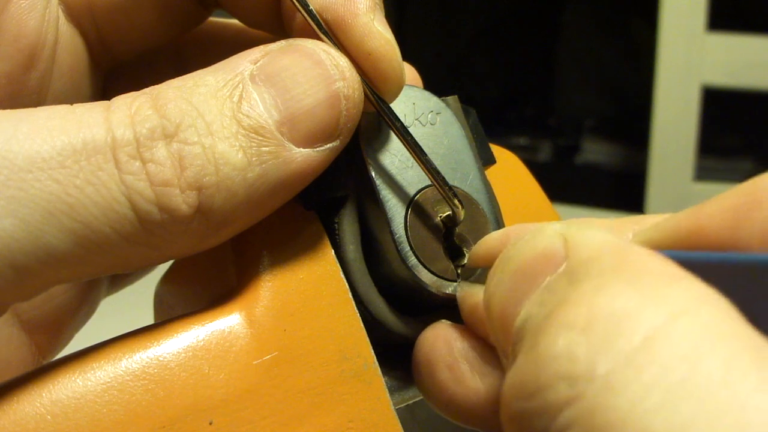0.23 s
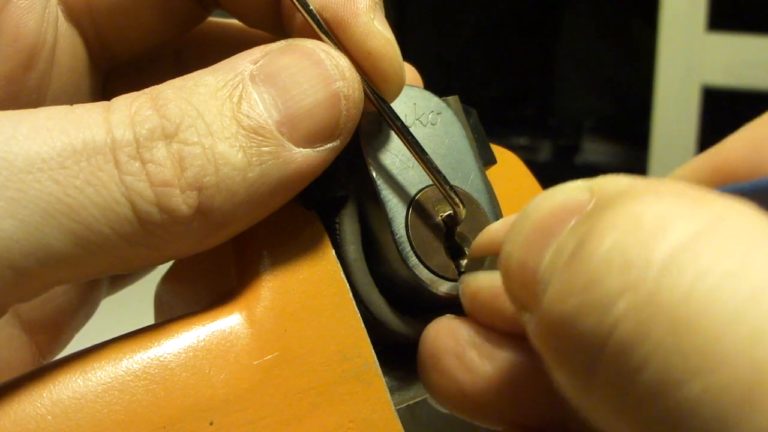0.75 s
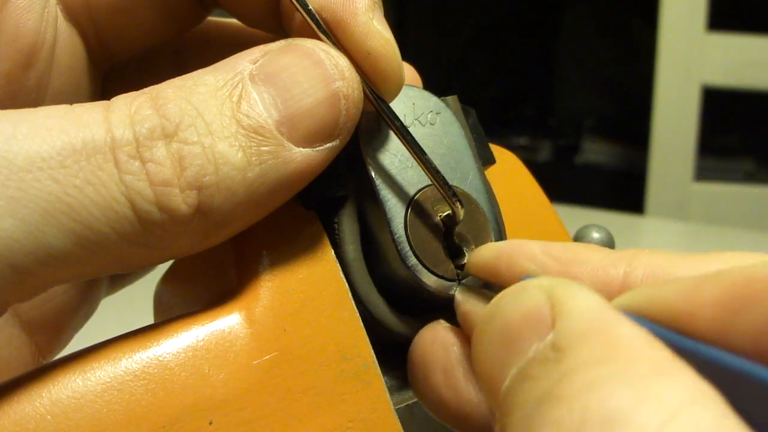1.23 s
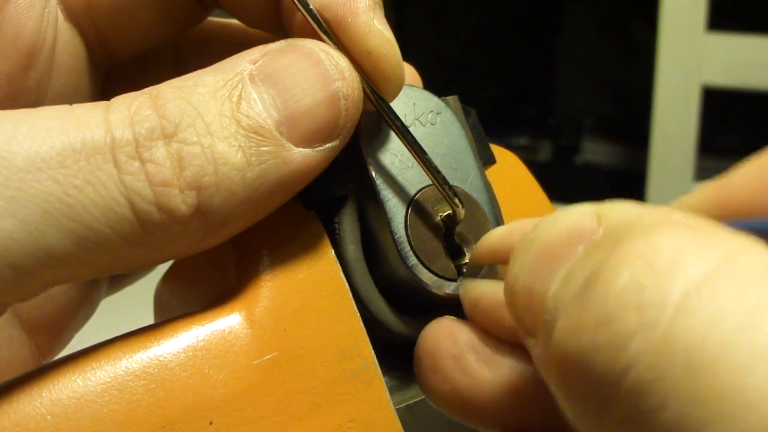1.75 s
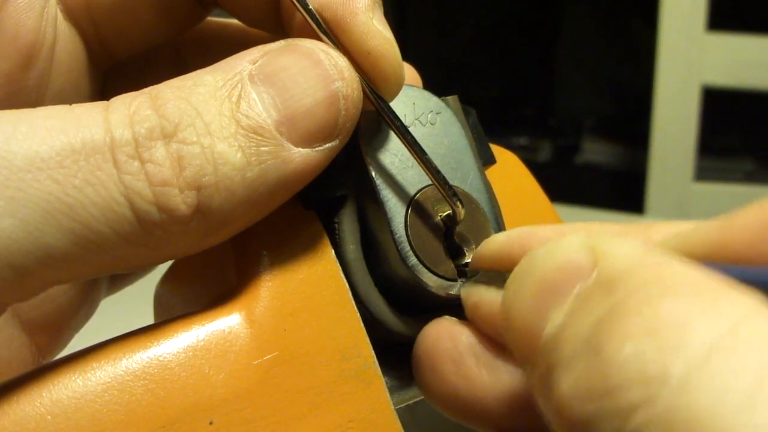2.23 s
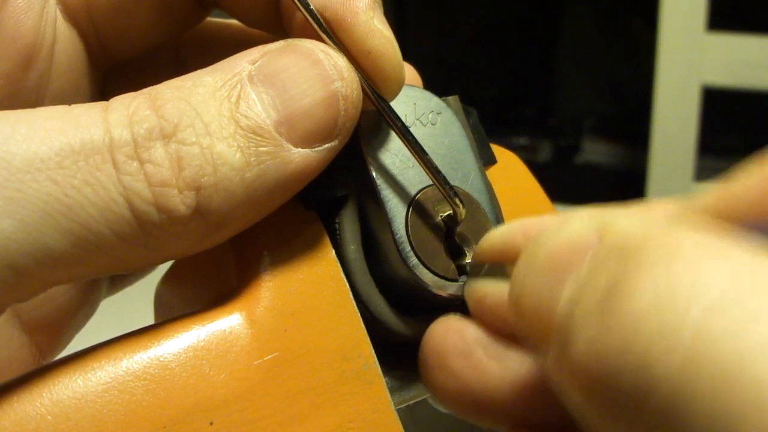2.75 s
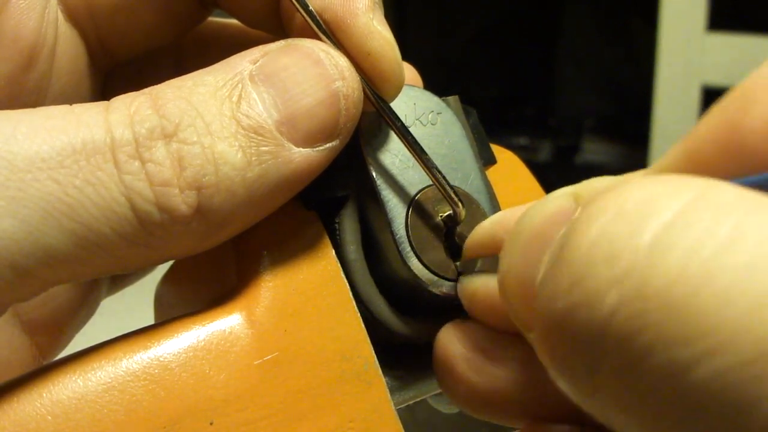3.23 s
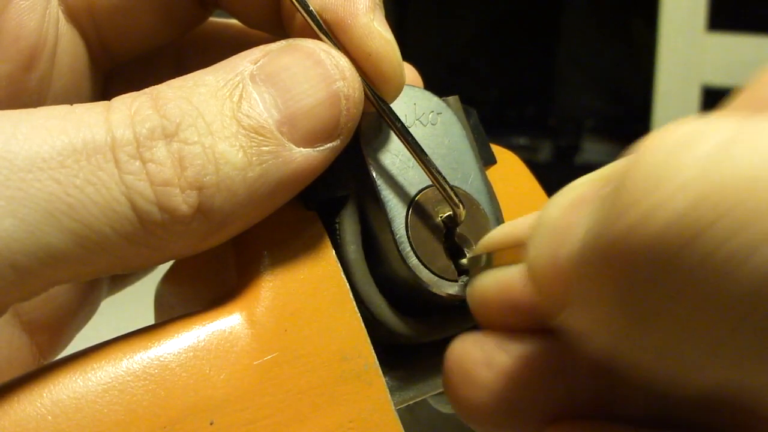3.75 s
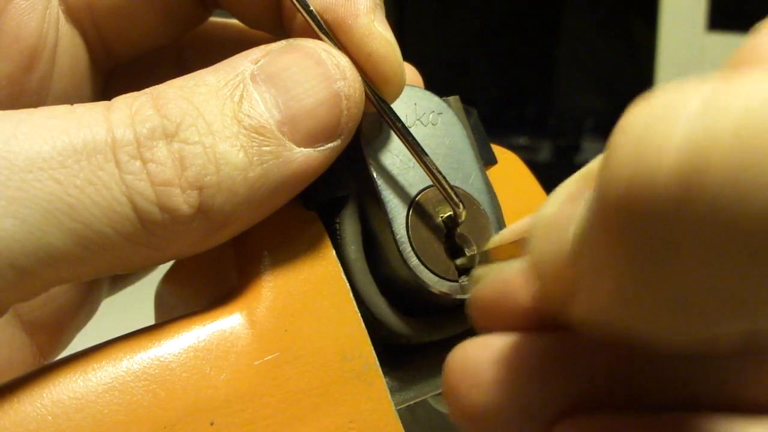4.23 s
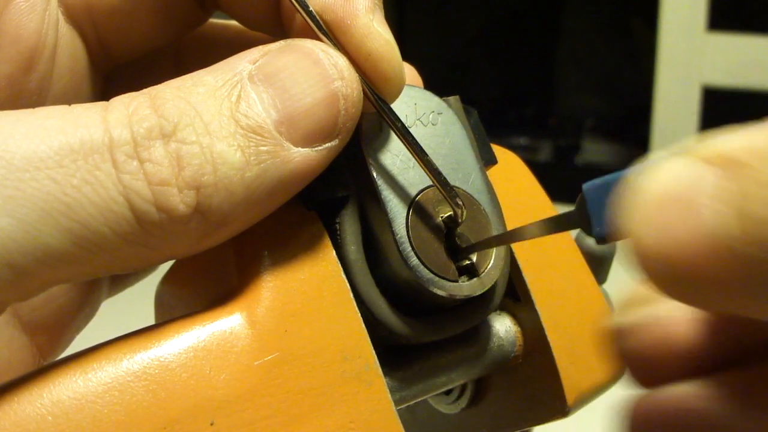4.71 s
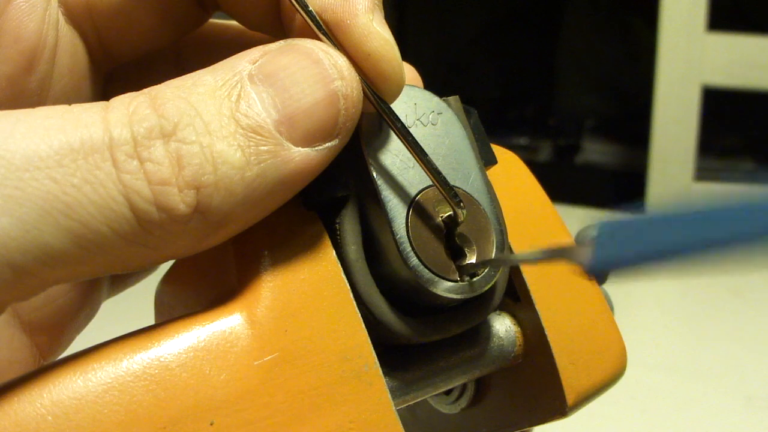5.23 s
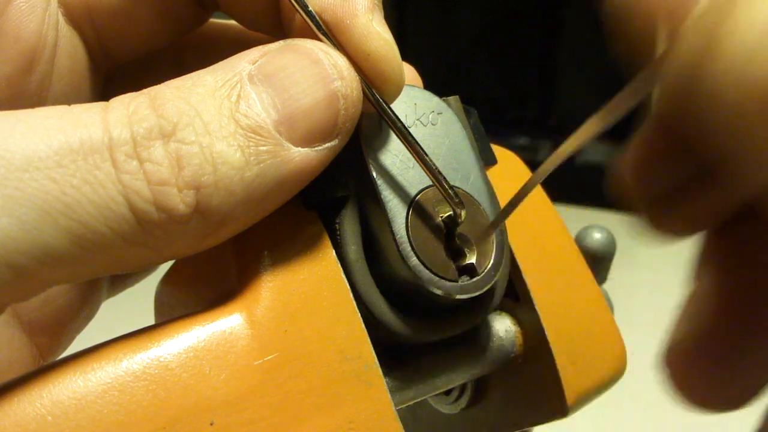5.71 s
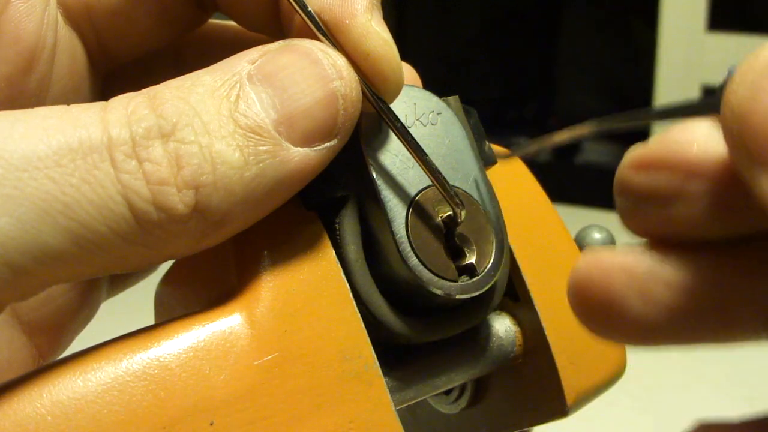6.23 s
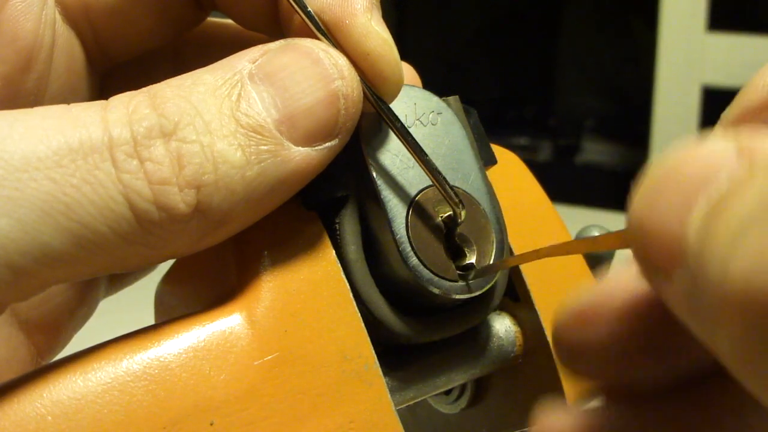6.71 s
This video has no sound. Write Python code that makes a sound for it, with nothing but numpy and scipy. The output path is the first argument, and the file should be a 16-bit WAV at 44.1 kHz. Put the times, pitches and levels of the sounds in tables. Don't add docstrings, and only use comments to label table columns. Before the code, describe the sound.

A thin steel pick works inside a brass lock held in a vice. Sharp, dry clicks of uneven strength come first, the hardest ringing briefly with a dull knock of the vice. After a sparse spell, faint probing ticks and scrapes follow, then the released pick rattles rapidly in the keyway and is caught and pulled out. A few tiny ticks end it. Very close small stereo microphone, quiet room, steady wide hiss.

```python
import sys
import numpy as np
from scipy import signal
from scipy.fft import rfft, irfft
from scipy.io import wavfile
from scipy.ndimage import uniform_filter1d

SR = 44100
rng = np.random.default_rng(int(sys.argv[2]) if len(sys.argv) > 2 else 0)


def waveform_to_disk(signal):
    frames = np.transpose(np.atleast_2d(signal))
    scaled = np.clip(frames, -1, 1) * 32767
    samples = np.round(scaled).astype(np.int16)
    wavfile.write(sys.argv[1], SR, samples)


def level_to_linear(level):
    exponent = np.asarray(level, float) / 20
    return 10 ** exponent


N = 307377

# (frequency [Hz], level [dB], t60 [s])
VICE = [(274.6, -0.5, 0.1), (300, -4, 0.2), (362.5, -1.5, 0.081), (406.6, -11.5, 0.086), (480, -10, 0.11),
        (527, 2, 0.034), (621, -7.5, 0.099), (454, -3.5, 0.013)]
# (frequency [Hz], level [dB], t60 [s])
KEYWAY = [(778.6, -10, 0.25), (880, -3, 0.11), (989, 3, 0.028), (1056, -3, 0.042), (1193, -10, 0.03),
          (1321, 6.5, 0.026), (1374, -17, 0.056)]
# (frequency [Hz], level [dB], t60 [s])
LOOSE_SHELL = [(1535, -9, .07), (1654, -18, .08), (1832, 1, .045), (1815, -8, .07), (2045, -6, .045),
               (2260, -16, .04)]
# (frequency [Hz], level [dB])
TICK = [(1500, -17.5), (2600, -16.5), (3500, -24.5), (4700, -26.5), (6000, -15.5), (10500, -16.5),
        (11500, -28), (12600, -65)]
PIN_PAN_DB, PIN_BODY_DB = 0.5, -1
LOW_CUT_HZ = 80


def steep(x, hz, kind, order=4):
    return signal.sosfilt(signal.butter(order, hz, kind, fs=SR, output="sos"), x)


def colour(x, points):
    size = x.shape[-1]
    bin_hz = np.arange(size // 2 + 1) * SR / size + 1
    hz, db = np.transpose(points)
    return irfft(rfft(x) * level_to_linear(np.interp(np.log(bin_hz), np.log(hz), db)), size)


def add(out, s, x):
    i = int(s * SR)
    n = min(x.shape[-1], N - i)
    out[..., i:i + n] += x[..., :n]


def peak(x, db):
    return x * level_to_linear(db) / np.abs(x).max()


def ring(modes, size=16384):
    hz, db, t60_s = np.transpose(modes)[:, :, None]
    t = np.arange(size) / SR
    decay = np.exp(-np.log(1000) * t / np.maximum(t60_s, .01))
    return level_to_linear(db) * np.sin(2 * np.pi * hz * t) * decay


def burst(noise, ms, rise_ms):
    t_ms = np.arange(len(noise)) / SR * 1000
    return noise * (1 - np.exp(-t_ms / rise_ms)) * np.exp(-t_ms / max(ms, .3))


def clamp(ms, db, size=16384):
    t_ms = np.arange(size) * 1000 / SR
    return level_to_linear(db * (1 - np.exp(-(t_ms / ms) ** 2)))


def flutter(noise, db, ms, size=16384):
    width = int(ms * SR / 1000 / 8)
    walk = uniform_filter1d(uniform_filter1d(noise, width), width)
    walk = np.repeat(walk, size // len(noise))
    uneven = uniform_filter1d(walk, size=8) / walk.std() - .5
    onset = np.clip(np.arange(size) * 1000 / SR / (2 * ms), 0, 1)
    return level_to_linear(db * uneven * onset)


def stroke(s, length_s, db):
    phase = np.clip((np.arange(N) / SR - s) / length_s, 0, 1)
    return level_to_linear(db) * np.sin(np.pi * phase) ** 2


def hiss():
    # (frequency [Hz], density [dB per Hz])
    spectrum = [(40, -47), (90, -16.5), (130, -12), (170, -7), (300, -2.5), (600, -2.5), (2000, -7.5),
                (2600, -19), (3500, -30.5), (4600, -32), (5700, -20.5), (10500, -16.5), (11300, -31.5),
                (14000, -33)]
    # (frequency [Hz], correlation [-1..1])
    likeness = [(1000, -0.42), (4000, -0.175), (7000, -0.011), (14000, 0.36)]
    # (frequency [Hz], rms level [dB])
    whine_tones = [(7800, -86), (7830, -87)]
    # (time [s], level [dB])
    treble_fade = [(0, -3), (4.3, -3.5), (4.6, -9.5), (6.97, -8.5)]
    level_db, cut_hz, knee_hz = -58.5, 14120, 9480
    mid, side = colour(rng.standard_normal((2, N)), spectrum)
    wide = []
    for hz, alike in likeness:
        alike = np.clip(alike, -.9, .9)
        wide.append((hz, 10 * np.log10((1 - alike) / (1 + alike))))
    pair = mid + colour(side, wide) * np.array([[1], [-1]])
    pair = steep(level_to_linear(level_db) / np.std(mid) * pair, cut_hz, "low", order=16)
    pair = colour(pair, [(cut_hz - 60, 0), (cut_hz + 20, -40)])
    top = colour(pair, [(knee_hz / 1.34, -40), (knee_hz, 0)])
    t = np.arange(N) / SR
    fade = level_to_linear(np.interp(t, *np.transpose(treble_fade))) - 1
    whine = sum(level_to_linear(db) * np.sqrt(2) * np.sin(2 * np.pi * hz * t) for hz, db in whine_tones)
    return pair + top * fade + whine


def knock_rows():
    # (time [s], shell peak [dB], vice [dB], keyway [dB], contact [ms])
    pin_knocks = [(0.0578, -51.5, -7, -6, 1.3), (0.1513, -19, -15.5, -14, 1.7),
                  (0.3843, -10.5, -1.5, -6.5, 1.93), (0.4937, -43.5, 1.5, 1, 1.8),
                  (0.5895, -40, 8.5, -2, 2.5), (0.627, -35.5, 2, 1, 1.1), (0.6412, -40, -7, -6, 6.4),
                  (0.7255, -53, -7, -3, 1), (0.9166, -40, -3.5, -26, 4.2), (0.9617, -44, -2, -1, 2.6),
                  (1.0661, -20, -14, -18, 2.45), (1.1156, -22, -7, -8.5, 1.3), (1.1877, -47, -23, 2, 3.2),
                  (1.3029, -46, -13, -15, 1.1), (1.5584, -63.5, 16.5, 1, 2.8),
                  (1.6042, -33.5, -3.5, -7.5, 1.2), (1.8638, -33, -7, -9, 2.2), (1.889, -46.5, -10, 3, 1.9),
                  (1.9265, -26, 7.5, -8.5, 1.65), (2.7985, -52, 1, -21, 4.5),
                  (2.8112, -30, -10.5, -14, 1.2), (2.9282, -54, -12, -15, 1.7),
                  (3.2121, -27.5, -4.5, -7, 2.2)]
    # (time [s], shell peak [dB], vice [dB], keyway [dB])
    probe_knocks = [(3.551, -40.5, -7.5, -24), (3.5568, -34, -14, -12), (3.5749, -43.5, 3, -5),
                    (3.6486, -41, -7, -2.5), (3.697, -58, 6.5, -4), (3.822, -46.5, -8, -1),
                    (3.865, -48, -9, -24), (3.922, -54.5, 3, -10), (3.9743, -46, 0.5, 1),
                    (4.067, -52, -22, 0), (4.122, -55, -7, 6), (4.2996, -46.5, -9, -3),
                    (4.345, -52, 4.5, 3), (4.3682, -53.5, 15, 6), (4.4016, -36, -6, 1.5),
                    (4.4689, -31, -19, -4), (4.576, -65, 8, -4.5), (4.6171, -37.5, -5, 5.5),
                    (4.6883, -43, -4, -18), (4.7529, -53, 6, -14), (4.8203, -47, -6, -18)]
    # (time [s], shell peak [dB], vice [dB], keyway [dB], contact [ms])
    swing_knocks = [(4.8363, -37, -4, -5, 1), (4.8394, -35, -0.5, -7, 4.6), (4.863, -32.5, -3.5, -24, 1),
                    (4.8703, -37.5, -2.5, -26, 5.2), (4.8815, -36, -16, -8, 3), (4.8955, -30, 2.5, -1, 1.7),
                    (4.907, -46, -13, 3, 3.3), (4.9367, -39, -1, -16, 5), (4.9503, -37.5, -6, 1.5, 5.6),
                    (4.9938, -32, -19, -18, 8.3), (5.0063, -24, -9, -2, 2.24), (5.0167, -43.5, 7, -11, 4.6),
                    (5.061, -40.5, -4, -2, 5.3), (5.1156, -53, 3, -17, 3), (5.1735, -48, -4, -3, 11),
                    (5.186, -48, 8.5, 0, 2.3), (5.234, -41, 2, 2.5, 7.8), (5.2497, -43, 0, -16, 4.5),
                    (5.3163, -46.5, -2.5, -10, 3.2), (5.3651, -46, 7, 7.5, 5.3),
                    (5.381, -44, -22, -15, 1.9), (5.433, -52, -22, -12, 6)]
    # (time [s], shell peak [dB], vice [dB], keyway [dB])
    hand_knocks = [(5.482, -51, -13, 0), (5.5005, -44.5, -6, -16), (5.526, -51, -21, 2),
                   (5.554, -42.5, -18.5, 8), (5.5716, -38.5, -4.5, -4), (5.5919, -45.5, 2.5, -15.5),
                   (5.6094, -42.5, -4, -8), (5.6297, -45.5, -18, -19), (5.7307, -52, 6.5, 1),
                   (6.515, -61.5, -11, -6), (6.5886, -48.5, 5.5, 6), (6.6186, -55, -8, 7),
                   (6.637, -56, 0, 15), (6.656, -62, 12, -9), (6.671, -61, 19, -5), (6.685, -61.5, 6, -1),
                   (6.8164, -46.5, 0, -5), (6.8315, -37.5, -9, -2.5)]
    probe_contact_ms, hand_contact_ms = 2.7, 3.86
    return (pin_knocks + [r + (probe_contact_ms,) for r in probe_knocks] + swing_knocks
            + [r + (hand_contact_ms,) for r in hand_knocks])


def knocks(rows):
    # (frequency [Hz], level [dB], t60 [s])
    tense_shell = [(1570, -9, .12), (1654, -4, .12), (1755, -9, .08), (1822, 5, .04), (1865, -5, .075),
                   (2030, -3, .035), (2200, -12, .05), (1790, -4, .03), (2400, -16, .03)]
    # (time [s], centre [Hz])
    pick_lean = [(0.1, 560), (0.5, 470), (0.6, 320), (0.75, 290), (0.9, 540), (1.3, 566), (1.95, 373),
                 (3.3, 283), (4.1, 480), (4.35, 292), (4.76, 300), (4.89, 670), (4.98, 500), (5.02, 383),
                 (5.14, 380), (5.3, 603), (6.6, 556), (6.84, 310)]
    # (time [s], shell centre [Hz], keyway centre [Hz])
    pin_struck = [(0.15, 1830, 1230), (0.384, 1760, 1090), (0.59, 1630, 1300), (0.627, 2030, 1060),
                  (0.724, 2110, 1040), (1.066, 1880, 1340), (1.115, 1640, 1090), (1.86, 1840, 1300),
                  (1.89, 1650, 1300), (1.93, 1640, 880), (2.81, 1930, 1320), (3.21, 2040, 1288),
                  (3.56, 2040, 1180), (4.47, 2010, 1350), (4.9, 1970, 1020), (5.4, 1830, 920),
                  (5.55, 1920, 1240), (6.83, 1950, 1230)]
    release_s, vice_cut_hz = 4.8, 213
    hard_blow_db, grip_span_db, grip_db_per_s = -10, 11.5, -52
    hard_choke_share = .8
    focus_db = (-26, -9, -15.5)
    scatter_db, even_share = 1.3, 0.7
    flutter_db, flutter_ms, shell_flutter_share = 4, 5, .35
    late_s = (0, .001, .0003)

    tables = (tense_shell, VICE, KEYWAY, LOOSE_SHELL)
    bands_hz = [(1497, 2360), (297.0, 753), (660, 2560), (1400, 2410)]
    bodies = [steep(ring(m), b, "band", order=3) for m, b in zip(tables, bands_hz)]
    bodies[1] = steep(bodies[1], vice_cut_hz, "high")
    out = np.zeros(N)
    forces = rng.standard_normal((len(rows), 2048))
    scatter = rng.standard_normal((len(rows), 3, 10))
    pin_s, pin_shell_hz, pin_keyway_hz = np.transpose(pin_struck)
    for (s, db, vice_db, keyway_db, ms), force, mix in zip(rows, forces, scatter):
        centres_hz = (np.interp(s, pin_s, pin_shell_hz), np.interp(s, *np.transpose(pick_lean)),
                      np.interp(s, pin_s, pin_keyway_hz))
        push = burst(force, ms, rise_ms=0.6 * ms)
        push[8] += 1.62 / ms * np.sqrt(np.sum(push ** 2))
        reach = np.abs(rfft(push)) / np.sqrt(np.sum(push ** 2)) + even_share
        grip = np.clip((hard_blow_db - db) / grip_span_db, 0, 1)
        choke = (clamp(45, -4 * max(grip, hard_choke_share)), clamp(15, -6.5 * grip), 1,
                 clamp(22, -5))
        struck = (3 if s > release_s else 0, 1, 2)
        levels_db = (db, db + vice_db, db + keyway_db)
        for part, k in enumerate(struck):
            hz, _, t60_s = np.transpose(tables[k])
            gain_db = focus_db[part] * np.abs(np.log2(hz / centres_hz[part]))
            gain_db = gain_db + scatter_db * mix[part][:len(hz)]
            if k == 0:
                gain_db = gain_db + grip_db_per_s * t60_s * grip
            even = 1 / reach[np.rint(hz * len(push) / SR).astype(int)]
            depth_db = flutter_db * (1 if k in (1, 2) else shell_flutter_share)
            tone = (level_to_linear(gain_db) * even) @ bodies[k] * choke[k]
            tone = tone * flutter(np.roll(force, 700 * k), depth_db, flutter_ms)
            add(out, s + late_s[part], peak(signal.fftconvolve(push, tone), levels_db[part]))
    return out


def room(x):
    # (t60 [s], level [dB], side share [ratio])
    tail_bands = [(0.33, -21, 0.22), (0.23, -15.5, 0.75)]
    split_hz = 1800
    t = np.arange(SR // 2) / SR
    tail = 0
    for (t60_s, db, apart), kind in zip(tail_bands, ("low", "high")):
        mid, side = steep(rng.standard_normal((2, len(t))), split_hz, kind, order=2)
        pair = (mid + apart * side * np.array([[1], [-1]])) / mid.std()
        decay = np.exp(-np.log(1000) * t / t60_s) * (t > .004)
        tail = tail + level_to_linear(db) * pair * decay / np.sqrt(t60_s * SR / 14)
    return signal.fftconvolve(x[None], tail)[:, :N]


def tick_rows():
    # (time [s], peak [dB], centre [Hz], chatter [ms], top band [dB])
    pin_ticks = [(0.1497, -31.5, 8250, 6.5, -41), (0.384, -19.5, 8700, 6.1, -25),
                 (0.59, -42.5, 6900, 3.2, -37), (0.624, -35.5, 7950, 4.3, -31),
                 (0.6403, -40, 6460, 4.1, -49), (0.7242, -57, 6650, 3, -41), (0.7933, -44, 6360, 2.4, -26),
                 (0.805, -42.5, 6800, 3.1, -36), (1.063, -39, 6060, 10, -40),
                 (1.1135, -20, 8650, 4.85, -63), (1.604, -33, 7760, 2, -49), (1.862, -44.5, 7550, 3.3, -44),
                 (1.926, -21.5, 6840, 3.9, -34), (2.811, -16, 8400, 2.1, -65),
                 (3.2102, -28.5, 7700, 2.8, -53)]
    # (time [s], peak [dB], centre [Hz])
    probe_ticks = [(3.5507, -43, 6050), (3.563, -40, 7080), (3.6526, -48, 7840), (3.863, -45, 7500),
                   (3.876, -38.5, 9300), (3.886, -50, 7500), (3.921, -49, 7950), (3.977, -43, 7430),
                   (4.0666, -50, 8240), (4.3, -44.5, 9050), (4.3445, -55, 9240), (4.365, -44.5, 7300),
                   (4.402, -42.5, 7770), (4.4213, -50, 7070), (4.47, -27, 7600), (4.617, -43, 8710),
                   (4.647, -46.5, 7800), (4.691, -44.5, 6600), (4.7008, -43, 7840), (4.753, -47, 7750)]
    # (time [s], peak [dB], centre [Hz], chatter [ms])
    swing_ticks = [(4.8407, -27.5, 8400, 3.2), (4.8632, -39, 5870, 9.9), (4.876, -32.5, 7000, 6.8),
                   (4.885, -31, 7340, 2.2), (4.895, -20.5, 11000, 2.8), (4.9346, -34, 6100, 6.2),
                   (4.941, -35, 7200, 5.4), (4.949, -34.5, 9080, 5.1), (4.9919, -32.5, 7000, 15),
                   (5.005, -24.5, 11300, 3.1), (5.0484, -41, 6700, 3.5), (5.056, -32, 6660, 2.4),
                   (5.062, -33.5, 7020, 2), (5.11, -38, 7450, 3.8), (5.1751, -37.5, 9400, 2.8),
                   (5.1845, -50, 8000, 2.1), (5.232, -32, 7600, 4.2), (5.303, -40.5, 7400, 14),
                   (5.315, -41, 6150, 3.4), (5.358, -36, 7360, 8.4), (5.3655, -40, 10100, 2.6),
                   (5.4334, -38, 6870, 5.1), (5.444, -43, 9330, 6.2)]
    # (time [s], peak [dB], centre [Hz])
    hand_ticks = [(5.485, -41.5, 7560), (5.5014, -43, 9100), (5.555, -37.5, 7600), (5.569, -38, 7750),
                  (5.589, -31.5, 7900), (5.609, -50, 6900), (5.657, -46, 6770), (5.712, -42.5, 6600),
                  (5.731, -31.5, 7200), (6.518, -44, 7030), (6.591, -45, 6750), (6.615, -37, 6900),
                  (6.635, -38, 7100), (6.658, -34, 7000), (6.67, -33.5, 6550), (6.8238, -38, 6300)]
    return ([r + (PIN_PAN_DB, PIN_BODY_DB) for r in pin_ticks]
            + [r + (2.2, -52, -2, 2) for r in probe_ticks]
            + [r + (-27, -1, -9) for r in swing_ticks]
            + [r + (3.5, -33, -2.5, -6.5) for r in hand_ticks])


def ticks(rows):
    # (frequency [Hz], level [dB])
    top_colour = [(11500, -55), (12300, 13), (14300, 10), (15100, -19)]
    split_hz, lead_samples = 5000, 256
    ring_ms, ring_share = 0.6, .2
    blade_ms, blade_share, blade_free_s = 4, .05, 6.64
    out = np.zeros((2, N))
    noise = rng.standard_normal((len(rows), 3, 2048))
    t = np.arange(400) / SR
    for (s, db, hz, ms, top_db, pan_db, body_db), (mid, side, grit) in zip(rows, noise):
        chatter = level_to_linear(27.5 * uniform_filter1d(grit, size=30))
        crack = np.array([burst((mid + k * .5 * side) * chatter, ms, rise_ms=0.03 * ms)
                          for k in (1, -1)])
        decay = np.exp(-t / 0.000077) + ring_share * np.exp(-t * 1000 / ring_ms)
        if s > blade_free_s:
            decay = decay + blade_share * np.exp(-t * 1000 / blade_ms)
        tone = np.sin(2 * np.pi * hz * t) * decay
        pick = signal.fftconvolve(crack, tone[None])[:, :2048]
        lead = np.roll(crack + .25 * pick, lead_samples, axis=1)
        main = colour(colour(lead, TICK), [(0.82 * split_hz, body_db), (1.46 * split_hz, 0)])
        tick = peak(main, db + 0.12) + peak(colour(lead, top_colour), db + top_db + .1)
        add(out, s - lead_samples / SR, tick * level_to_linear([[pan_db / 2], [-pan_db / 2]]))
    return out


def bench():
    # (frequency [Hz], level [dB], t60 [s])
    bench_modes = [(110.7, 3, 0.42), (122, 5.5, 0.48), (126.86, 11, 0.87), (138, -9, 0.27)]
    # (time [s], peak [dB])
    thumps = [(0.15, -67), (0.378, -41), (0.593, -50), (0.629, -48), (1.061, -57.5), (1.116, -61),
              (1.862, -62), (1.928, -56), (2.812, -58.5), (3.211, -72), (3.558, -60.5), (3.975, -60.5),
              (4.368, -57.5), (4.613, -57), (4.842, -44.5), (4.875, -45), (4.937, -70), (5.002, -57),
              (5.109, -61), (5.236, -60), (5.361, -67), (5.485, -57.5), (5.555, -63.5), (6.59, -65.5)]
    out = np.zeros(N)
    hum = steep(ring(bench_modes).sum(0), (100, 165), "band", order=2) * clamp(ms=120, db=-5)
    for (s, db), noise in zip(thumps, rng.standard_normal((len(thumps), 2048))):
        add(out, s, peak(hum * flutter(noise, db=3, ms=19), db + 0.12))
    return out


def snaps():
    # (time [s], peak [dB], frequency [Hz], t60 [ms])
    snap_rows = [(0.7258, -34.5, 995, 17), (0.726, -41.5, 1470, 18), (0.7257, -42.5, 2060, 26),
                 (1.3035, -40.5, 2000, 21), (4.8957, -28, 990, 30), (0.3875, -17, 1817, 62),
                 (1.067, -29, 1837, 55), (1.117, -33, 530, 41), (2.8122, -23.5, 1826, 62),
                 (2.8128, -33, 2050, 60), (3.2125, -37, 2035, 46), (4.8415, -30, 1856, 30),
                 (4.8833, -34, 1820, 60), (4.899, -37.5, 1550, 110), (4.938, -41, 1830, 90),
                 (4.953, -39, 993, 52), (5.012, -38.5, 375, 120), (4.935, -56, 4300, 15),
                 (4.941, -55, 4440, 15), (4.952, -55, 4500, 15), (5.359, -67, 3430, 15),
                 (5.589, -49, 3380, 18)]
    out = np.zeros(N)
    for s, db, hz, t60_ms in snap_rows:
        tone = ring([(hz, 0, t60_ms / 1000)], size=2048)[0]
        add(out, s, peak(steep(tone, (hz / 2, hz * 2), "band", order=1), db))
    return out


def further_knocks():
    # (time [s], shell peak [dB], vice [dB], keyway [dB], contact [ms])
    further_knock_rows = [(4.379, -62, 4, 16, 6), (4.415, -56, 10, -5, 4), (4.444, -64, 10, -10, 6),
                          (4.479, -53.5, 8.5, -10, 5.9), (4.508, -66, 10, -8, 5.1), (4.524, -61.5, 16, -8, 3.8),
                          (4.541, -63, 13, -8, 5), (4.556, -65, 15, -8, 4), (4.608, -58, 10, 5, 1.7),
                          (4.635, -52, 6, 5, 4.5), (5.026, -52, 10, -10, 6.7), (5.108, -48, -6, -17, 2.5),
                          (5.125, -59, 9, -10, 3), (5.288, -53, -2, -15, 7.3), (5.328, -45.5, -12, -15, 4),
                          (5.44, -45.5, -18, -10, 3.5), (0.497, -44, -14, -7, 4), (1.944, -47, -7, 0, 5)]
    return knocks(further_knock_rows)


def more_ticks():
    # (time [s], peak [dB], centre [Hz], chatter [ms], top band [dB])
    more_tick_rows = [
        (2.815, -23.5, 7900, 2.8, -60),
        (4.3005, -46, 9000, 2, -25),
        (5.186, -46, 8500, 1.5, -35),
    ]
    return ticks([r + (PIN_PAN_DB, PIN_BODY_DB) for r in more_tick_rows])


def rubbing():
    # (time [s], level [dB])
    rub_pressure = [
        (4.28, -57),
        (4.516, -57),
        (4.742, -66),
        (4.876, -47),
        (5.044, -48),
        (5.16, -54),
        (5.474, -52),
        (5.598, -48),
        (5.75, -67),
    ]
    shell_db, vice_db, bright_db = -23.5, -21.5, 14.5
    brush = stroke(3.852, 0.046, -40)
    shift = stroke(3.9, 0.39, -63)
    sizes = level_to_linear(2.2 * rng.exponential(size=(3, N))) * rng.standard_normal((3, N))
    slips = (rng.random((3, N)) < 900 / SR) * sizes
    t = np.arange(N) / SR
    pressure = level_to_linear(np.interp(t, *np.transpose(rub_pressure), left=-150, right=-150))
    slips = slips * (pressure + np.array([brush / 4, shift, brush]))
    shell_ring = steep(ring(LOOSE_SHELL + KEYWAY).sum(0), (620, 2700), "band", order=3)
    shell = signal.fftconvolve(slips[0], shell_ring)[:N]
    vice = signal.fftconvolve(slips[1], steep(ring(VICE).sum(0), 326, "high"))[:N]
    bright = colour(slips[2], TICK)
    return level_to_linear(shell_db) * shell + level_to_linear(vice_db) * vice + level_to_linear(bright_db) * bright


def fan():
    # (time [s], length [s], centre [Hz], width [Hz], level [dB])
    motor_hiss = (3.85, .56, 10450, 350, -79)
    s, length_s, hz, width_hz, db = motor_hiss
    edges_hz = (hz - width_hz / 2, hz + width_hz / 2)
    band = steep(rng.standard_normal((2, N)), edges_hz, "band", order=2)
    return band / band.std() * np.sqrt(stroke(s, length_s, 2 * db))


def scene():
    lock = knocks(knock_rows()) + snaps() + rubbing() + ticks(tick_rows())
    lock = lock + room(lock.mean(0)) + further_knocks() + bench() + more_ticks()
    return steep(lock, LOW_CUT_HZ, "high", order=3) + hiss() + fan()


def low_pass(x):
    return signal.sosfilt(signal.butter(12, 15140, fs=SR, output="sos"), x)


def record(dry):
    # (low edge [Hz], high edge [Hz])
    nulls = [(2830, 3190), (3840, 4170), (4840, 5190), (11500, 12500), (13150, 13750)]
    ceiling, top_hz = .42, 14900
    mix = steep(ceiling * np.tanh(dry / ceiling), LOW_CUT_HZ / 2, "high", order=1)
    for band_hz in nulls:
        mix = steep(mix, band_hz, "stop", order=2)
    mix = steep(mix, top_hz, "low", order=8)
    return low_pass(mix)


dry = scene()
out = record(dry)
waveform_to_disk(out)
```